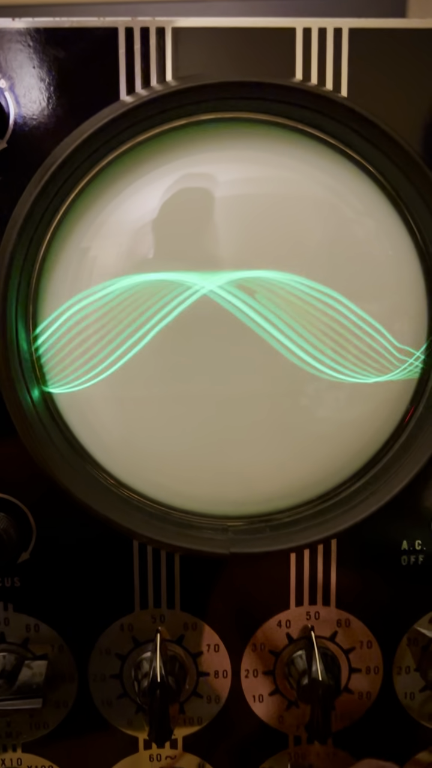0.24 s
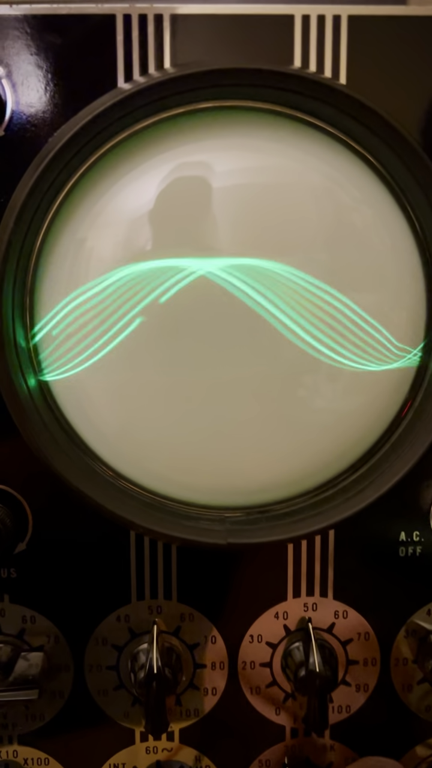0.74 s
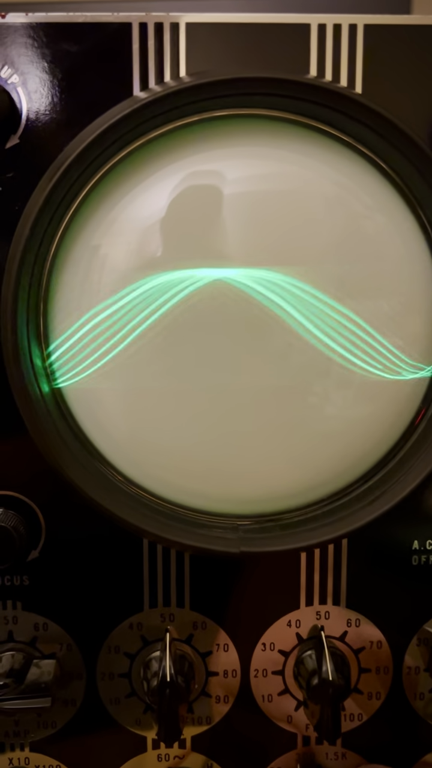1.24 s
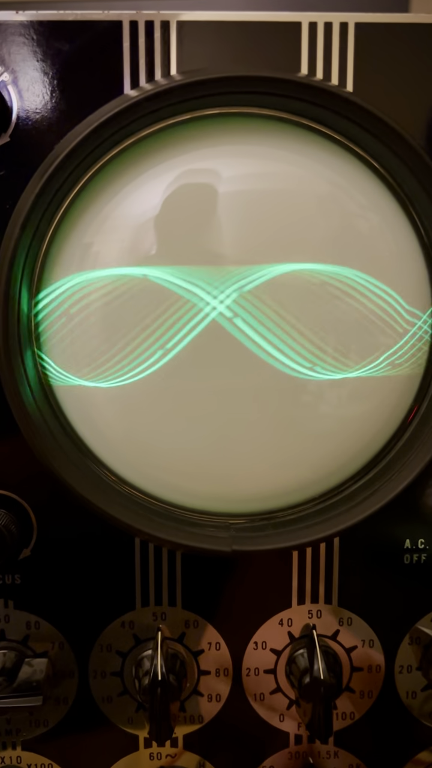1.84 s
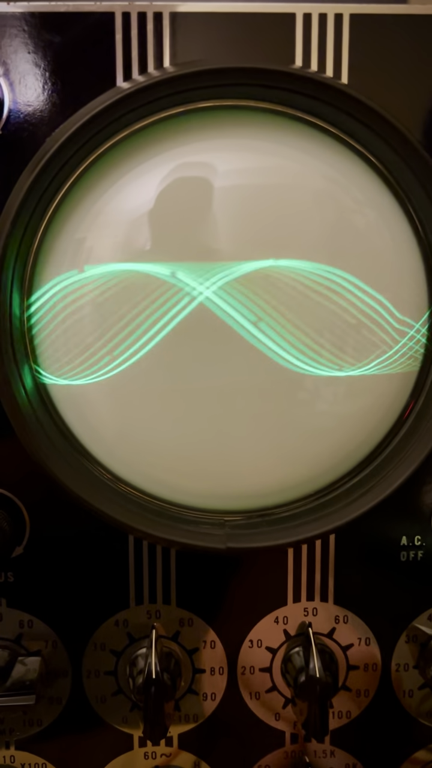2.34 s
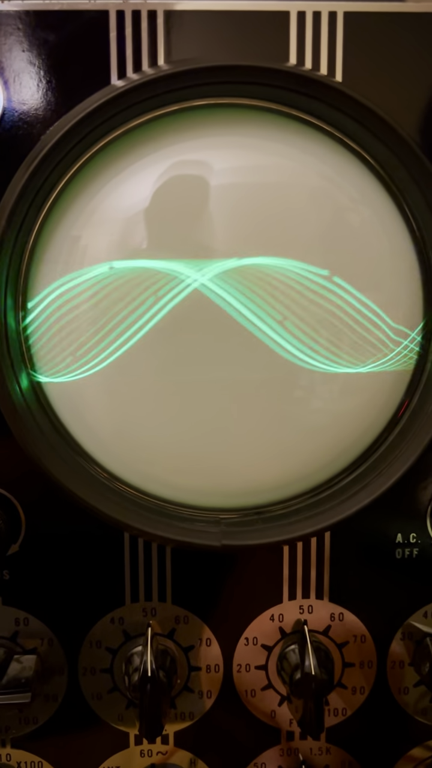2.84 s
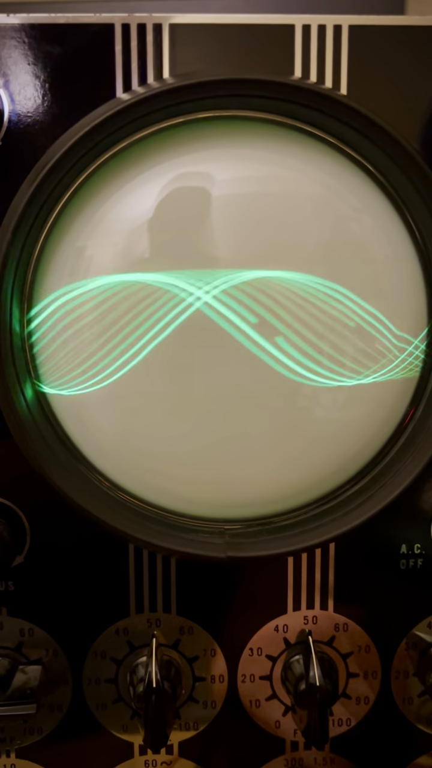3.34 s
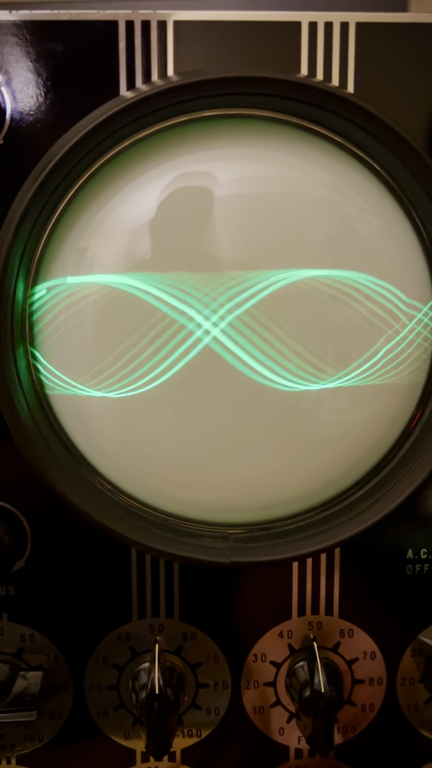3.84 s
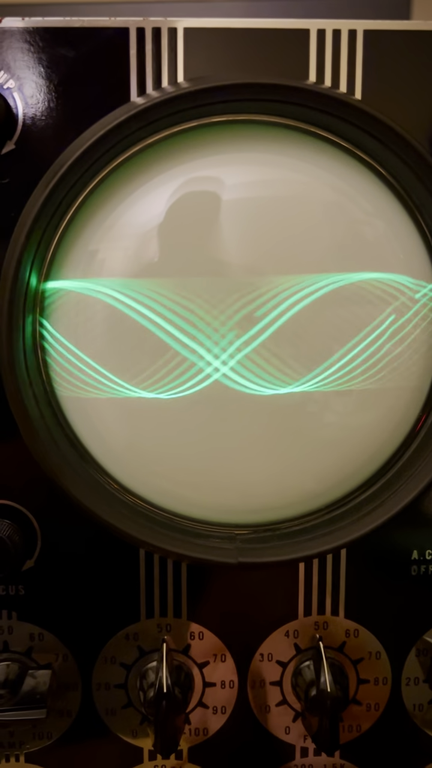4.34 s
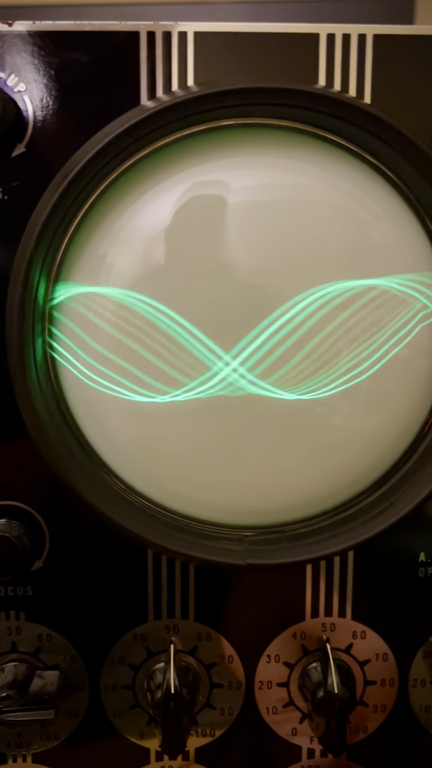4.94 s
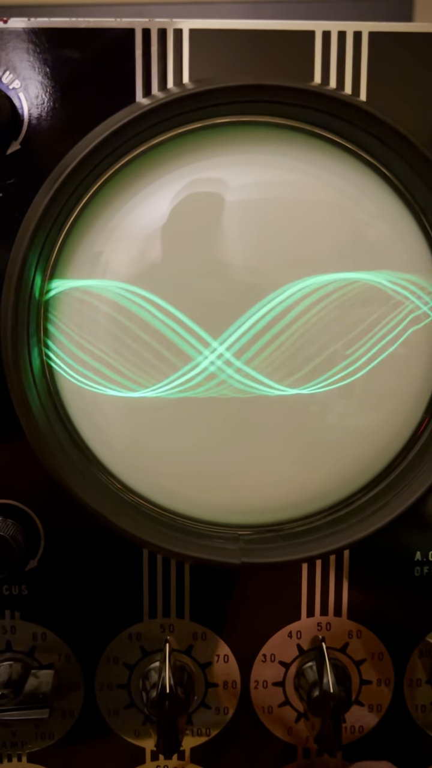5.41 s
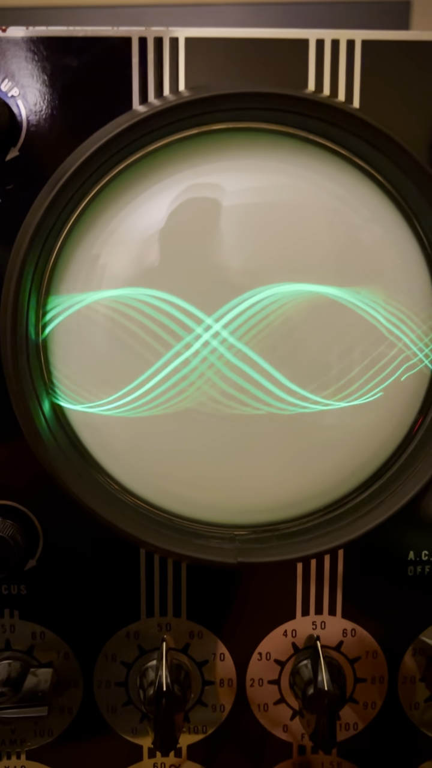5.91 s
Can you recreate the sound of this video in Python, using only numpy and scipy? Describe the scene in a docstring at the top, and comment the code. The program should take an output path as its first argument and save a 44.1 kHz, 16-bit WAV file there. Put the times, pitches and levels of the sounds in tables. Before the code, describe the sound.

A quiet workshop with soft transformer hum; muffled detent knocks, then stiff switches creak and snap, the loudest cracks near the middle and end.

```python
"""Close to an old instrument panel in a quiet workshop. A low room rumble, transformer hum and faint hiss
run throughout, made of shaped noise and narrow tones. At once a farther detent knocks on a metal cabinet:
noise bursts ring its modes. Then knobs are tapped, the hand bumps the case and knobs creak faintly.
From about one second, stiff switches creak, squeal as short wavering tones and snap over as bright cracks.
Later a fingertip drags over a knob: rough noise through its lower modes."""
import sys
import numpy as np
from scipy import signal
from scipy.fft import rfft, irfft
from scipy.io import wavfile
from scipy.ndimage import uniform_filter1d

SR = 44100
rng = np.random.default_rng(int(sys.argv[2]) if len(sys.argv) > 2 else 0)


def inscribe(sig):
    """Save sig as 16-bit PCM at rate SR to the path in sys.argv[1].

    A 1-D sig is mono; a 2-D sig holds one channel per row.
    Samples are clipped to [-1, 1] before scaling.
    """
    pcm = np.round(np.clip(np.atleast_2d(sig).T, -1, 1) * 32767)
    wavfile.write(sys.argv[1], SR, pcm.astype(np.int16))


def nominal_scale(level):
    """Amplitude ratio for a level in decibels (scalar or array-like)."""
    x = np.asarray(level, float) / 20
    return 10 ** x


N = 272097  # length in samples

# Room noise before scaling: f/Hz, level per Hz/dB
AIR_SPECTRUM = [(15, -63.5), (25, -35.5), (70, -2.5), (200, -7.5), (301, -10), (326, -22), (363, -20.5),
                (591, -27), (641, -30.5), (863, -32.5), (2110, -34.5), (2280, -38), (2610, -41.5),
                (7510, -44), (16000, -59.5)]
AIR_DB = -62.5  # rms of the room noise before its bass swells
# How alike the room noise is left and right: f/Hz, likeness (1 = the same)
AIR_LIKENESS = [(60, 0.94), (180, 0.87), (550, 0.11), (1650, 0.57), (4970, 0.13), (15000, 0.07)]
# Swell of the room's bass, used relative to its mean: t/s, level/dB
BASS_SWELL = [(0.0, -54.5), (0.24, -67), (0.39, -65.5), (0.6, -56.5), (1.15, -67.5), (1.58, -62.5),
              (2.4, -67.5), (2.7, -67), (2.94, -61.5), (3.13, -59.5), (3.27, -57), (3.81, -65),
              (4.69, -62.5), (5.59, -70), (5.98, -62.5), (6.17, -59.5)]
# Transformer tones: f/Hz, rms level/dB
HUM_TONES = [(118.4, -78.5), (161.5, -72), (199.2, -73.5), (253.0, -74), (296.1, -75.5), (360.7, -81.5),
             (597.5, -90.5)]
# Thin whines: f/Hz, rms level/dB, start/s, end/s
WHINES = [(2234, -98, 1.5, 3.2), (7450, -99, .6, 3.4)]

# Knocks of the farther detent: t/s, peak level/dB, fading time/s (limited in use), thump level/dB
KNOCKS = [(.003, -45.5, 0.15, -56), (0.4246, -40.5, 0.23, -41), (.472, -40, .24, -42.5),
          (.513, -44.5, 0.2, -46), (.64, -41, 0.32, -44.5), (.691, -42, 0.14, -44), (2.063, -44, 0.17, -41),
          (3.563, -40, 0.24, -40.5), (3.607, -45.5, 0.08, -48), (3.68, -42.5, 0.15, -44.5)]
# Modes of the metal cabinet: f/Hz
CABINET_HZ = [500, 810, 1250, 1700, 2090, 2690, 3200, 3650, 4780, 5500, 6210, 6680, 7800, 9300, 11000,
              13500]
# The same modes in the same order: width/Hz, level/dB (treble is lowered in use)
CABINET_MODES = [(192, -0.5), (205, 2.5), (265, -5), (162, 4), (210, 0), (334.8, -5), (260, -3.5),
                 (360, -7.5), (330, -3.5), (900, -14), (250, -9), (260, -6), (900, -20), (1520, -20.5),
                 (1000, -26), (2500, -38)]
KNOCK_TREBLE_DB = -4.5  # on the modes above 4 kHz
# Each knock also thumps through the bench: delay, pitch, length, boom over thump
THUMP_DELAY_S, THUMP_HZ, THUMP_S, THUMP_BOOM_DB = 0.00674, 221.6, 0.022, -7

# The hand bumps the case: t/s, level/dB, pitch/Hz, push length/s, boom level/dB relative to the bump
BUMPS = [(0.131, -49, 179, 0.029, -10), (.824, -44, 76.6, 0.035, -20), (1.078, -30.5, 169.8, 0.025, -16),
         (1.441, -54.5, 159, 0.034, -1), (1.576, -41.5, 338, 0.029, 0), (1.869, -57.5, 185, 0.05, -6),
         (2.718, -30, 104, 0.013, -15.5), (2.82, -38.5, 164, 0.015, -9), (2.883, -38.5, 290, .013, -5),
         (3.055, -52.5, 321.7, 0.051, 6), (3.229, -35, 326, 0.017, -1), (3.243, -36.5, 103, 0.027, -7.5),
         (3.297, -46.5, 70., 0.031, -6), (3.376, -42.5, 259, 0.027, -17), (4.236, -49, 162, 0.021, -6.5),
         (4.627, -39, 313, 0.046, 2.5), (4.643, -36, 310, 0.011, -7.5), (4.649, -38.5, 100, .03, -11.5),
         (5.787, -30.5, 142, 0.02, -8.5), (5.822, -43, 70., 0.056, -17.5), (6.086, -53.5, 181, 0.049, 10.5),
         (6.114, -42.5, 87, 0.016, -7.5)]
# Modes of the hollow case: f/Hz, width/Hz, level/dB
CASE_MODES = [(70, 30, -4.5), (100, 36, 1.5), (164, 35, -4.5), (186, 23, -2), (241, 14, 1.5),
              (290, 9.3, -4), (341, 6.6, -10), (478.7, 24, -10)]
BOOM_T60_S = 0.21

# Finger taps on the knobs: t/s, level/dB, brightness/dB, rattle t60/s
TAPS = [(0.123, -58, 5, 0.25), (0.372, -39, -24, 0.16), (1.071, -54.5, -22, 0.056),
        (1.457, -57, 7.5, 0.019), (2.713, -51, -6, 0.12), (2.82, -43, 0.5, 0.092), (2.887, -42, 3.5, 0.11),
        (2.931, -52, 4, 0.19), (3.06, -42, 4, 0.072), (3.222, -26, 14, 0.12), (4.236, -52, -9, 0.035),
        (4.627, -28, -4, 0.028), (5.555, -54, 17, 0.061), (5.781, -37.5, -5.5, 0.037)]
# Modes of a plastic knob: f/Hz, width of one pass/Hz, level/dB before the tap's brightness
KNOB_MODES = [(332, 153, 7.5), (500, 260, 5), (920, 250, -4.5), (1139.5, 530, -2.5), (1710, 110, -3),
              (2400, 170, -3), (2980, 350, -14.5), (5800, 220, -22)]

# A knob creaks faintly under the fingers: t/s, length/s, level/dB, squeak share/dB
CREAKS = [(0.241, 0.21, -78.5, -2), (3.091, 0.075, -80.5, -28), (3.771, 0.11, -79.5, -17),
          (3.855, .2, -75.5, -14.5), (4.218, 0.052, -89, 2.5), (4.999, .085, -81, -15),
          (5.109, 0.073, -78.5, -20), (5.2, 0.076, -86, -16.5)]
CREAK_EDGE, CREAK_EDGE_DB = 0.19, -6.5  # swell and fade as a share of the length; level at the ends
CREAK_TREBLE_DB, CREAK_LOW_DB = -15, -6.5
# A stiff switch is forced over: t of the snap/s, snap level/dB, peak strain to snap/s, strain level/dB,
# rattle level just after/dB
THROWS = [(1.134, -64.5, 0.039, -81, -92), (1.599, -42.5, .045, -57, -61), (3.23, -40, .03, -59.5, -52),
          (4.63, -26.5, .05, -58.5, -44.5), (5.787, -34.5, .018, -48.5, -52),
          (6.101, -43, 0.033, -57, -58.5)]
STRAIN_S, STRAIN_RISE_DB = 0.04, 34  # the build-up of strain
SNAP_RISE_S, SNAP_FALL_S, RATTLE_S, RATTLE_FADE_DB = 0.016, 0.015, 0.16, -37.5
# Shares beside the main modes: (squeak dB, treble dB, low dB); soft snaps and rattles lose treble
STRAIN_MIX, SNAP_MIX, RATTLE_MIX = (-15.5, -12.5, -8.5), (-19, -12, -12.5), (-12.5, -5.5, -6)
HARD_DB, DULL_PER_DB = -41, 6.5  # treble lost in dB for each dB that a snap is softer than HARD_DB
# Main modes of a switch: f/Hz, width of one pass/Hz, level/dB
SWITCH_MODES = [(2080, 180, -1), (2400, 170, 5), (2750, 290, 2), (3150, 250, -17.5)]
# Upper modes of a switch: f/Hz, width/Hz, level/dB
SWITCH_TOP_MODES = [(5000, 340, 3.5), (5934, 500, 1.5), (6900, 460, 1), (8090, 2200, -12)]

# The spring squeals up and lets go: t of the peak/s, level/dB, pitch/Hz, fall/s, left over right/dB
SQUEALS = [(1.113, -61, 2460, 0.0018, -6), (1.132, -53.5, 2480, 0.00099, -1),
           (1.592, -39, 2564, 0.0029, -1), (1.5969, -34.5, 2723, 0.0015, -1), (2.912, -54, 2500, 0.0014, 3),
           (3.212, -47, 2810, 0.0061, 7), (3.2252, -32.5, 2366, .0011, -1.5),
           (3.229, -33, 2400, 0.00094, -12.5), (3.235, -30, 2500, 0.00097, -0.5),
           (4.6262, -28, 2347, .003, 0), (4.6289, -14.5, 2445, .0008, 1), (4.631, -13.5, 2617, .0008, 1),
           (5.7856, -15.5, 2598, 0.00059, 1), (5.791, -32, 2500, 0.0023, -1),
           (6.065, -49, 2620, 0.0013, -3), (6.104, -46, 2750, 0.00095, 5)]
SQUEAL_RISE = 0.99  # rise time over fall time

# Contacts snap: t/s, level/dB, length/s, left over right/dB
SNAPS = [(1.579, -60.5, 0.0021, 0), (1.595, -53, 0.00053, 3), (2.576, -76, .002, 4),
         (2.932, -75, .0023, -2), (3.234, -32, 0.0013, 2), (3.848, -73, 0.0027, 5),
         (4.236, -74.5, 0.003, 0), (4.593, -66.5, 0.0027, 0), (4.6282, -20, .0018, -1),
         (5.5565, -76, 0.0028, 0.5), (5.771, -38, 0.0062, -1), (5.783, -47.5, .002, 0),
         (6.093, -65, 0.0055, 2), (6.103, -61, 0.0026, 0)]
# Spectrum of the crack: f/Hz, level/dB
SNAP_SPECTRUM = [(1940, -40.5), (3300, -13), (3770, -12), (5240, -10.5), (5900, -9), (6390, -8),
                 (7390, -12), (8000, -13.5), (11600, -9), (16000, -30)]
# Ringing of the metal lever: f/Hz, level/dB before the lever's own level, t60/s
LEVER_TONES = [(1077, -3, 0.074), (2170, -6.5, .03), (6140, 2, .02), (10180, -9, 0.022)]
LEVER_DB, LEVER_FIRM_DB, LEVER_LOSS_PER_DB = -9, -46.5, 1  # faint snaps barely ring the lever

# A fingertip drags over a knob: start/s, time to the peak/s, time after the peak/s, peak of the level curve/dB
SCRAPES = [(3.493, 0.049, .018, -56), (4.228, .012, .045, -56), (4.288, .03, .08, -64)]
# Lower modes of the scraped knob: f/Hz, width of one pass/Hz, level/dB
SCRAPED_MODES = [(555, 62, 6.5), (790, 300, -4), (1062, 200, -0.5), (1250, 180, -6.5), (1568, 68, 3.5)]
SCRAPE_START_DB, SCRAPE_END_DB = -7.5, -16  # relative to the peak

# Stereo width of near sounds: f/Hz, side over mid/dB before a general lift
NEAR_WIDTH = [(60, -14), (150, -16), (380, -8), (950, -11.5), (2380, -11), (5980, -5), (15000, -5.5)]
# How long the room rings: f/Hz, t60/s
ROOM_T60 = [(300, 0.61), (790, 0.15), (2090, 0.15), (5510, 0.18), (12000, 0.27)]


def evened(x):
    """Scales to rms 1."""
    return x / np.sqrt(np.mean(x ** 2) + 1e-20)


def read(points, hz):
    """Reads a spectrum table on a log-frequency axis."""
    f, value = np.transpose(points)
    return np.interp(np.log(hz + 1), np.log(f + 1), value)


def add(mix, s, sound):
    """Mixes a sound in at a time in seconds."""
    part = mix[..., max(round(s * SR), 0):][..., :sound.shape[-1]]
    part += sound[..., :part.shape[-1]]


def ring(x, hz, width):
    """One resonance with a gain of about 1 at its pitch; a narrower one rings longer."""
    r = np.exp(-np.pi * max(width, 2) / SR)
    return 2 * signal.lfilter([1 - r], [1, -r * np.exp(2j * np.pi * hz / SR)], x).real


def body(x, modes):
    """Passes a drive through all the modes of an object."""
    return sum(nominal_scale(db) * ring(x, hz, width) for hz, width, db in modes)


def steep(x, modes):
    """Like body, with each mode applied twice so the valleys between modes stay dark."""
    return sum(nominal_scale(db) * ring(ring(x, hz, width), hz, width) for hz, width, db in modes)


def band(x, lo_hz, hi_hz):
    """Keeps the sound between two frequencies."""
    return signal.sosfilt(signal.butter(2, [lo_hz, min(hi_hz, SR * .49)], "band", fs=SR, output="sos"), x)


def low_pass(x, edge_hz, order=4):
    """Keeps the sound below a frequency."""
    return signal.sosfilt(signal.butter(order, min(edge_hz, SR * .49), fs=SR, output="sos"), x)


def coloured(x, points):
    """Shapes the spectrum of a sound with a table."""
    gain = nominal_scale(read(points, np.fft.rfftfreq(len(x), 1 / SR)))
    return irfft(rfft(x) * gain, len(x))


def panned(x, pan_db):
    """Places a sound left or right by a level difference."""
    return x * nominal_scale(np.array([[.5], [-.5]]) * pan_db)


def air():
    """Room noise in drifting patches; its bass swells and sinks."""
    frames, hz = N // 256 + 5, np.fft.rfftfreq(1024, 1 / SR)
    a, b, c, d, patches = rng.standard_normal((frames, 513, 5)).T
    patches = evened(uniform_filter1d(uniform_filter1d(patches, 10, 0), 12, 1))
    s, level_db = np.transpose(BASS_SWELL)
    swell_db = np.interp(np.arange(frames) * 256 / SR, s, level_db - level_db.mean())
    bass = 1 / (1 + (hz / 500) ** 4)  # the swell acts mostly below 500 Hz
    same = np.clip(read(AIR_LIKENESS, hz), -1, 1)[:, None]
    left = a + 1j * b
    right = same * left + np.sqrt(1 - same ** 2) * (c + 1j * d)
    z = np.array([left, right])
    z *= nominal_scale(read(AIR_SPECTRUM, hz)[:, None] + 1.3 * patches)
    steady = np.sqrt(np.mean(signal.istft(z, nperseg=1024, noverlap=768)[1] ** 2))
    z *= nominal_scale(np.outer(bass, swell_db))
    return nominal_scale(AIR_DB) / steady * signal.istft(z, nperseg=1024, noverlap=768)[1][:, :N]


def hum():
    """Transformer tones that waver slightly (narrow noise), and thin whines that come and go."""
    t = np.arange(N) / SR
    out = np.zeros(N)
    for hz, db in HUM_TONES:
        out += nominal_scale(db) * evened(steep(rng.standard_normal(N), [(hz, 9., 0)]))
    for hz, db, start, end in WHINES:
        on = np.clip(np.minimum(t - start, end - t) / 0.195, 0, 1)
        waver = evened(steep(rng.standard_normal(N), [(hz, 20., 0)]))
        out += nominal_scale(db) * on * evened(np.sin(2 * np.pi * hz * t) + 0.74 * waver)
    return out


def knocks():
    """Each knock is a sharp front and a grainy rattle through the sheet-metal modes that soon damps out."""
    out, t = np.zeros((2, N)), np.arange(SR // 2) / SR
    modes = [(hz, width, level + KNOCK_TREBLE_DB * (hz > 4000))
             for hz, (width, level) in zip(CABINET_HZ, CABINET_MODES)]
    for s, db, fading, _ in KNOCKS:
        shared, grain, *own = rng.standard_normal((4, len(t)))
        grain = nominal_scale(0.82 * evened(uniform_filter1d(grain, 150)))
        u = t / np.clip(fading, .05, .26)
        rattle = nominal_scale(-22 * u - 35.6 * u ** 2)
        front = 1.24 * np.exp(-t / 0.0012)
        shape = (1 - np.exp(-t / 0.00024)) * (rattle + front)
        # noise partly shared by left and right
        ears = np.array([steep(shape * grain * (0.59 * shared + 0.66 * n), modes) for n in own])
        add(out, s, nominal_scale(db) * ears / abs(ears).max())
    return out


def pushes(rows):
    """A soft push sounds its own low note and sets the hollow case booming."""
    out, t = np.zeros(N), np.arange(SR // 2) / SR
    for s, db, hz, length, boom_db in rows:
        u = t / max(length, .004)
        note = np.sin(2 * np.pi * hz * t) * (1 - np.exp(-t / 0.015)) * np.exp(-u ** 2)
        boom = evened(low_pass(body(rng.standard_normal(len(t)), CASE_MODES), 650))
        boom *= (1 - np.exp(-t / 0.0027)) * nominal_scale(boom_db - 60 * t / BOOM_T60_S)
        add(out, s, nominal_scale(db) * (note + boom))
    return out


def thumps():
    """Each farther knock travels through the bench and arrives as a low push on the case."""
    return pushes([(s + THUMP_DELAY_S, db, THUMP_HZ, THUMP_S, THUMP_BOOM_DB) for s, _, _, db in KNOCKS])


def taps():
    """A soft blow and a faint rattle ring the plastic knob; brighter taps stir its upper modes more."""
    out, t = np.zeros(N), np.arange(4096) / SR
    for s, db, bright_db, t60 in TAPS:
        rattle = rng.standard_normal(len(t)) * .035 * nominal_scale(-60 * t / max(t60, .005))
        blow = (t == 0) + rattle
        modes = [(hz, width, level + bright_db * (hz > 1950)) for hz, width, level in KNOB_MODES]
        lower = low_pass(steep(blow, modes[:-1]), 3100, order=6)
        highest = steep(band(blow, 5200, 6400), modes[-1:])
        sound = lower + highest
        add(out, s, nominal_scale(db) * sound / abs(sound).max())
    return out


def bumps():
    """The hand pushes the case, with a low note and a boom."""
    return pushes(BUMPS)


def rubbed(tables, voice, grain_db):
    """Dense uneven slips, voiced by the rubbed object and following each stroke's level curve."""
    out = np.zeros(N)
    for rows in tables:
        s, *columns = np.transpose(rows)
        t = np.arange(s[0], s[-1], 1 / SR)
        level_db, *shares_db = (np.interp(t, s, c) for c in columns)
        grain = evened(uniform_filter1d(rng.standard_normal(len(t)), 60))
        slips = rng.standard_normal(len(t)) * nominal_scale(grain_db * grain)
        soft_ends = signal.windows.tukey(len(t), .06)
        add(out, s[0], nominal_scale(level_db) * voice(slips, *shares_db) * soft_ends)
    return out


def creak(start, length, db, squeak_db):
    """Level curve of a rubbing knob: it swells, holds and fades."""
    mix = (squeak_db, CREAK_TREBLE_DB, CREAK_LOW_DB)
    shape = [(0, CREAK_EDGE_DB), (CREAK_EDGE, 0), (1 - CREAK_EDGE, 0), (1, CREAK_EDGE_DB)]
    return [(start + u * length, db + edge_db, *mix) for u, edge_db in shape]


def throw(s, snap_db, lead, strain_db, rattle_db):
    """Level curve of a forced switch: strain builds and holds, it snaps over, and a rattle dies away."""
    dull_db = DULL_PER_DB * min(snap_db - HARD_DB, 0)
    squeak_db, treble_db, low_db = SNAP_MIX
    snap = (squeak_db, treble_db + dull_db, low_db)
    squeak_db, treble_db, low_db = RATTLE_MIX
    after = (squeak_db, treble_db + dull_db, low_db)
    lead = max(lead, SNAP_RISE_S + .001)  # keeps the points in order
    return [(s - lead - STRAIN_S, strain_db - STRAIN_RISE_DB, *STRAIN_MIX),
            (s - lead, strain_db, *STRAIN_MIX),
            (s - SNAP_RISE_S, strain_db, *STRAIN_MIX),
            (s, snap_db, *snap),
            (s + SNAP_FALL_S, rattle_db, *after),
            (s + RATTLE_S, rattle_db + RATTLE_FADE_DB, *after)]


def strokes():
    """Rubbing slips creak in the main modes, with a thin squeak, a hiss above and a duller scrape below."""
    def voice(slips, squeak_db, treble_db, low_db):
        main = evened(steep(slips, SWITCH_MODES))
        squeak = evened(steep(slips, [(4190, 170, 0)]))
        treble = evened(band(body(slips, SWITCH_TOP_MODES), 4500, 12000))
        low = evened(band(slips, 500, 1700) + 0.4 * ring(slips, 1050, 69))
        return main + nominal_scale(squeak_db) * squeak + nominal_scale(treble_db) * treble + nominal_scale(low_db) * low
    curves = [throw(*row) for row in THROWS] + [creak(*row) for row in CREAKS]
    return rubbed(curves, voice, 2.01)


def squeals():
    """A tone of wavering pitch that grows quickly and dies once the spring lets go."""
    out, t = np.zeros((2, N)), np.arange(-700, 900) / SR
    for s, db, hz, fall, pan_db in SQUEALS:
        rise = max(SQUEAL_RISE * fall, .0003)
        shape = np.exp(np.where(t < 0, t / rise, -t / max(fall, .0003)))
        shape = uniform_filter1d(shape, 30)
        wander = 1 + 0.043 * evened(uniform_filter1d(rng.standard_normal(len(t)), 90))
        tone = np.sin(2 * np.pi * (np.cumsum(hz * wander) / SR + rng.random()))
        add(out, s + t[0], panned(nominal_scale(db) * shape / shape.max() * tone, pan_db))
    return out


def snaps():
    """A bright crack of a few milliseconds that also rings the metal lever."""
    out, t = np.zeros((2, N)), np.arange(2048) / SR
    lever = sum(nominal_scale(db - 60 * t / t60) * np.sin(2 * np.pi * hz * t) for hz, db, t60 in LEVER_TONES)
    for s, db, length, pan_db in SNAPS:
        lever_db = LEVER_DB + LEVER_LOSS_PER_DB * min(db - LEVER_FIRM_DB, 0)
        crack = evened(coloured(rng.standard_normal(len(t)), SNAP_SPECTRUM))
        shape = (1 - np.exp(-t / .0002)) * np.exp(-t / max(length, .0003))
        add(out, s, panned(nominal_scale(db) * (crack * shape + nominal_scale(lever_db) * lever), pan_db))
    return out


def scrapes():
    """A fingertip drags over a knob and stirs only its lower modes."""
    drags = [[(s, db + SCRAPE_START_DB), (s + rise, db), (s + rise + fall, db + SCRAPE_END_DB)]
             for s, rise, fall, db in SCRAPES]
    return rubbed(drags, lambda slips: evened(steep(slips, SCRAPED_MODES)), 5.3)


def near(x):
    """A source close to the microphone pair reaches the two ports with a phase step but equal level."""
    quarter_turn = signal.hilbert(x.mean(0), N + N % 2).imag
    side = coloured(quarter_turn, NEAR_WIDTH)[:N]
    return x + nominal_scale(3.5) * np.array([side, -side])


def room(x):
    """Sparse reflections of random sign, each band dying at its own speed."""
    echoes = np.zeros((2, SR))
    at = np.arange(200, SR - 20, 20) + rng.integers(0, 20, (2, (SR - 201) // 20))
    np.put_along_axis(echoes, at, rng.choice([-1., 1.], at.shape), 1)
    hz, t, z = signal.stft(echoes, SR, nperseg=256)
    fade = nominal_scale(-60 * t / read(ROOM_T60, hz)[:, None])
    tail = signal.istft(z * fade, SR, nperseg=256)[1]
    return signal.fftconvolve(x[None], tail / np.linalg.norm(tail[0]), axes=1)[:, :N]


def scene():
    """Near panel sounds with their room tail, the farther knocks and the background."""
    background = air() + hum()
    farther = knocks() + thumps()
    panel = taps() + strokes() + squeals() + scrapes()
    cracks = snaps()
    tail = room(nominal_scale(-10) * cracks.mean(0) + nominal_scale(-14) * panel.mean(0))
    return background + farther + bumps() + near(cracks + panel) + tail


def top_cut(x):
    """Nothing passes above the cut-off."""
    return signal.sosfilt(signal.butter(12, 16640, fs=SR, output="sos"), x)


def record(dry):
    """The microphone cuts the deepest bass, below 36 Hz."""
    mix = signal.sosfilt(signal.butter(4, 36, "high", fs=SR, output="sos"), dry)
    return top_cut(mix)


dry = scene()
out = record(dry)
inscribe(out)
```